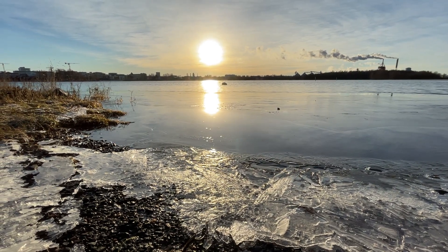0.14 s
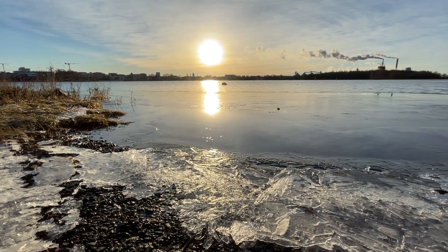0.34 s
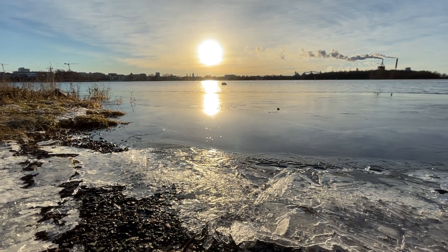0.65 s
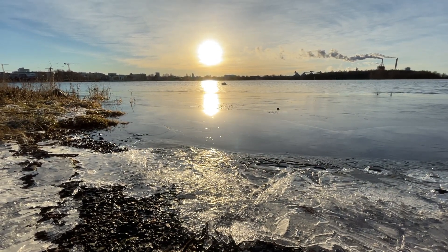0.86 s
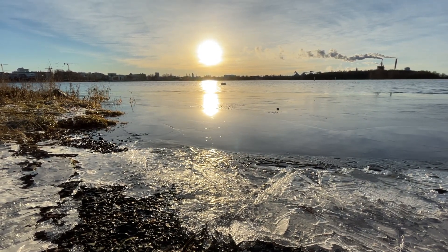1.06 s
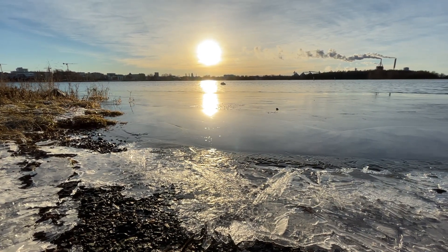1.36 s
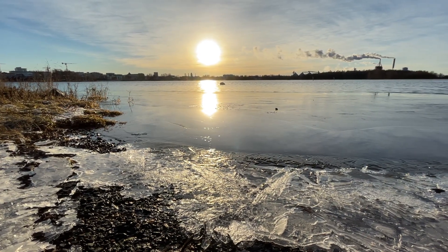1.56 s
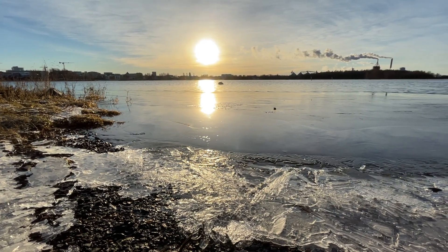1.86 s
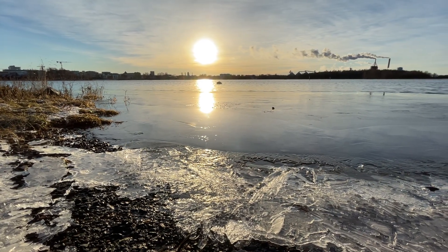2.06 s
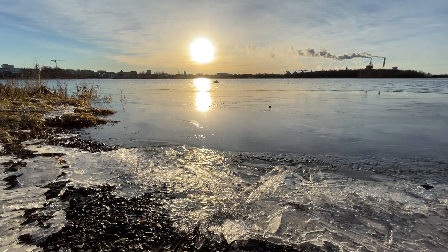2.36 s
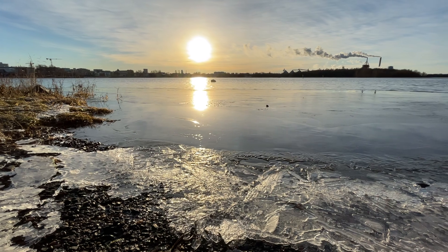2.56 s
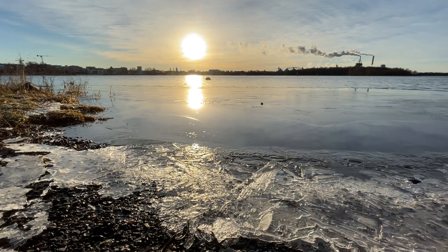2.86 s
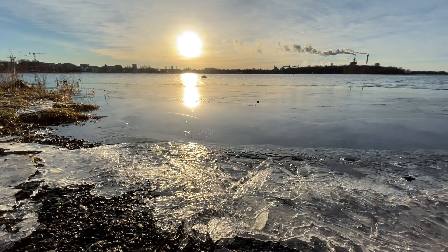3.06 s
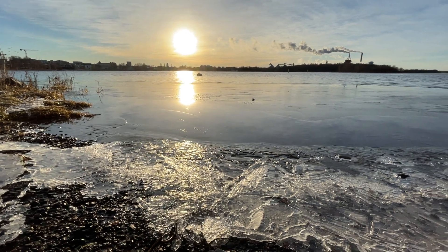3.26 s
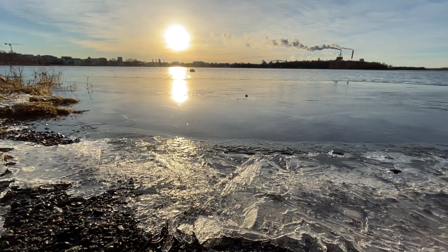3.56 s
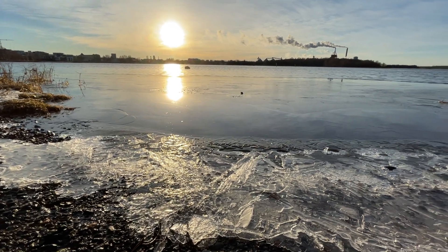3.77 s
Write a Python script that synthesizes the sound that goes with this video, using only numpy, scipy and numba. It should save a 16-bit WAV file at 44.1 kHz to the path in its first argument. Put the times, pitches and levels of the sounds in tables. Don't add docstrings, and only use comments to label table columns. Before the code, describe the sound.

Thin ice sheets crackle and tick sharply at a stony shore over soft fizzing wash

```python
import sys
import numpy as np
from scipy import signal
from scipy.fft import rfft, irfft
from scipy.io import wavfile
from scipy.ndimage import uniform_filter1d, map_coordinates
from numba import njit

SR = 44100
rng = np.random.default_rng(int(sys.argv[2]) if len(sys.argv) > 2 else 0)


def put_to_file(sound):
    columns = np.atleast_2d(sound).T
    safe = np.clip(columns, -1, 1)
    whole_steps = np.round(safe * 32767)
    wavfile.write(sys.argv[1], SR, whole_steps.astype(np.int16))


def natural_amplitude(level_db):
    exponent = np.asarray(level_db, float) / 20
    return 10 ** exponent


N = 172872

# onset [t/s], peak [level/dB], ping [f/Hz], treble spray re ping [level/dB]
DULL_CRACKS = [(0.11, -51.5, 2640, 6), (0.2234, -47.5, 1700, -2), (1.2365, -42, 4360, -6),
               (1.2503, -40.5, 4150, 2.5), (1.3475, -42, 3770, 3), (1.3728, -50, 3700, 2),
               (1.499, -50.5, 4200, 9), (1.5895, -50, 3220, 3), (1.6344, -46.5, 4060, 0),
               (2.1014, -45, 4460, -0.5), (2.183, -42, 4430, -9), (2.204, -48, 1510, -7),
               (2.224, -52, 2430, -1), (2.3166, -59, 4160, -11), (2.394, -44.5, 3170, 4),
               (2.434, -46, 2000, 8), (2.5067, -54, 4030, 17.5), (2.9808, -44.5, 3630, 7),
               (3.124, -34, 4600, -19), (3.1875, -47.5, 2550, -15), (3.3334, -41.5, 2700, 2.5),
               (3.5738, -38, 4190, -10), (3.6067, -33, 2840, -12), (3.6145, -32, 2320, -25),
               (3.6564, -47, 3380, 4), (3.692, -44, 2050, -6), (3.739, -62, 3450, -1),
               (3.8079, -45, 1310, -15), (3.8863, -48, 3100, 6)]
# onset [t/s], peak [level/dB], ping [f/Hz], low spray re ping [level/dB]
BRIGHT_CRACKS = [(0.1078, -41, 7340, -12), (0.432, -38.5, 6000, -19), (1.056, -40, 9230, -12),
                 (1.1433, -34.5, 8500, -15.5), (1.1973, -38, 9000, -25), (1.2386, -42.5, 5110, -11),
                 (1.2494, -38, 6960, -9.5), (1.3498, -32, 5400, -11.5), (1.3723, -35.5, 5360, -15),
                 (1.499, -44, 6200, -16), (1.5269, -42, 8600, -10), (1.647, -45, 6510, -10),
                 (2.2246, -33, 4900, -29), (2.239, -36, 9500, -10), (2.331, -44, 9900, -24),
                 (2.3642, -35.5, 6250, -18), (2.4282, -43, 8790, -8), (2.5067, -49, 5900, -1.5),
                 (2.7893, -27.5, 9200, -22.5), (2.8945, -33, 9700, -36), (2.9925, -39.5, 9720, -24),
                 (3.035, -31, 8100, -26), (3.1133, -37, 6480, -23), (3.3737, -40, 7700, -17),
                 (3.474, -43.5, 9700, -9), (3.5739, -48.5, 9900, 2.5), (3.615, -36.5, 6640, -7),
                 (3.6565, -33, 8240, -20), (3.82, -37, 8300, -12.5), (3.8939, -32, 7460, -16.5)]
# onset [t/s], peak [level/dB]
FAINT_CRACKS = [(0.0526, -40), (0.1369, -39.5), (0.5164, -43), (0.7173, -59), (0.7363, -45), (0.827, -35.5),
                (0.9532, -82), (1.2978, -39), (1.3295, -43), (1.4415, -39), (1.6084, -42), (1.6674, -48),
                (1.695, -50), (1.7277, -46), (1.7539, -46), (1.7965, -45), (1.8234, -51), (1.9793, -39),
                (2.144, -67), (2.2566, -34), (2.3047, -62), (2.662, -38.5), (2.9134, -39), (2.9226, -36),
                (3.412, -37), (3.512, -43), (3.5304, -38), (3.648, -51), (3.723, -44), (3.7467, -40)]
# onset [t/s], peak [level/dB], pitch [f/Hz]
PLATE_KNOCKS = [
    (1.349, -42.5, 550),
    (1.97, -57, 641),
    (1.991, -45, 690),
    (2.26, -45, 647),
    (2.504, -46.5, 620),
    (2.792, -66, 773),
    (3.615, -50, 646),
]
# onset [t/s], peak [level/dB], centre [f/Hz]
SMALL_TICKS = [(0.1543, -33.5, 8300), (0.2738, -47, 8520), (0.474, -45.5, 3930), (0.6398, -38, 7790),
               (0.6644, -30, 9780), (0.7514, -51, 5250), (1.083, -37, 10300), (1.1797, -38.5, 4200),
               (1.3034, -46, 4290), (1.314, -44, 6920), (1.3894, -41, 4290), (1.4014, -45, 9380),
               (1.4246, -42, 4500), (1.4674, -49, 3860), (1.518, -48, 3760), (1.5559, -47, 9390),
               (1.8714, -49.5, 3480), (1.9455, -59, 8550), (1.9717, -50, 6540), (1.9914, -45, 5380),
               (2.0303, -52, 4590), (2.0614, -54, 3710), (2.1001, -47, 4250), (2.393, -46, 2960),
               (2.4602, -37, 4220), (2.7687, -35, 9700), (2.8494, -48, 7540), (2.9494, -43, 7790),
               (3.02, -34, 9010), (3.0604, -48, 5410), (3.3039, -40, 6140), (3.4494, -57, 10100),
               (3.6732, -38, 5350), (3.7694, -43, 4030), (3.841, -53, 3800), (3.901, -33, 6280),
               (3.9114, -41, 3000)]
# onset [t/s], peak [level/dB], pitch [f/Hz], ring [cycles]
CLOSE_PLIPS = [(0.2229, -49.5, 1720, 4.8), (0.524, -55, 2300, 4), (1.3501, -52, 940, 5.3),
               (1.351, -43, 6000, 6.9), (1.350, -49, 3000, 4.4), (1.5898, -46.5, 1870, 7.5),
               (1.593, -52, 2300, 6.9), (1.352, -51, 2180, 1.8), (3.723, -50, 940, 2.1),
               (.2235, -58, 1450, 3.3), (1.872, -55.5, 1470, 2.3), (1.798, -57, 940, 3.3),
               (1.9695, -58, 930, 2.5), (1.992, -51, 930, 1.8), (2.205, -57, 1490, 5), (2.79, -62, 1260, 3),
               (3.333, -51.5, 1410, 4), (3.573, -56, 1610, 2.3), (3.6152, -42, 660, 2.3),
               (3.6152, -37.5, 1680, 5.2), (3.6152, -35, 3240, 2.2), (3.6155, -35.5, 2350, 5),
               (3.66, -50, 2000, 5.2), (3.692, -49.5, 1420, 2.5), (3.740, -49.5, 1510, 4),
               (3.808, -49, 2200, 4.6), (3.886, -52, 1290, 3)]
# time [t/s], fizz [level/dB], loose crackle re fizz [level/dB]
WASH_SWELL = [(0, -58.5, 1.5), (.18, -59, -2.5), (.25, -63.5, -0.5), (.42, -68, 3.5), (.5, -62.5, 4.5),
              (.72, -54.5, -7), (.95, -58.5, -1), (1.45, -60.5, 5), (1.66, -70, 7), (1.79, -73, 2),
              (1.85, -67, 2), (2.17, -64, 2.5), (2.3, -56.5, -1), (2.7, -57, 2), (2.95, -53, 1.5),
              (3.1, -58, -8), (3.58, -53, 0), (3.92, -54.5, -7)]
# [f/Hz], density per Hz [level/dB]
ICE_COLOUR = [(600, 9.5), (1500, 0), (2400, 0.5), (5400, 2), (7500, -0.5), (9500, 0), (12300, -6.5),
              (15500, -5)]
# [f/Hz], lag [radians]
PORT_LAG = [(0, 0), (1700, 3.1), (2400, 6.2), (3500, 6), (5300, 10.2), (7500, 6.6), (8300, 4.5),
            (11000, 5.7), (12000, 6.3), (14600, 9.4), (16000, 9.76)]
# [f/Hz], left minus right [level/dB]
PORT_BALANCE = [(1900, -.3), (5000, 1.5), (7500, -1), (9500, -8), (11000, -2), (13000, -.3)]
# [f/Hz], likeness [0-1]
PORT_LIKENESS = [(1000, .4), (2000, .25), (5300, .55), (9300, .15), (11800, .96), (13100, .78),
                 (14700, .94), (16000, .94)]
# [f/Hz], density per Hz [level/dB]
RUMBLE_COLOUR = [(15, -20), (25, 9), (59, 0), (196, -3), (280, -8), (626, -15.5), (749, -21), (945, -22.5),
                 (1800, -38.5), (2340, -35), (3960, -120)]
# [f/Hz], side minus mid [level/dB]
RUMBLE_SIDE = [(60, -16), (200, -12), (400, -8), (800, -5), (1800, -3)]

PING_DB, PING_CYCLES = -2.5, 3.6
SPRAY_S, TICK_CYCLES = .0025, 1.26
FAINT_DB, KNOCK_DB, KNOCK_CYCLES = -5.5, 3.5, 1.4
TICKS_DB, TICKS_WIDTH = -7.5, 1.64
PLIP_SIDE_DB = -3
FIZZ_DB = 2.53
CRACKLE_DB, CRACKLE_SPREAD_DB, CRACKLE_S, CRACKLE_OCTAVES = -1.5, 1.4, .001, 1
CRACKLE_LOW_HZ, PATCH_FULL_HZ = 2200, 4500
PATCH_DB, PATCH_PER_S, PATCH_HZ = 3.5, 9, 1670
SCATTER_DB, SCATTER_S = -11, .0025
RUMBLE_DB, RUMBLE_FLICKER_DB, RUMBLE_FLICKER_PER_S, RUMBLE_LAG_S = -48, -0.94, 5.46, .00027
RUMBLE_TOP_HZ = 2500
HUM_HZ, HUM_DB, HUM_WIDTH_HZ = 129.7, -63.5, 7.1
LOW_CUT_HZ, TOP_HZ = 42, 15850


def ice():
    hits = cracks(DULL_CRACKS, 4200, 15600) + cracks(BRIGHT_CRACKS, 995, 5900)
    hits = hits + faint_cracks() + knocks()
    crackle = swarm(CRACKLE_DB, CRACKLE_SPREAD_DB, CRACKLE_S, CRACKLE_OCTAVES, count=650, size=14, loose=1)
    fizz = swarm(FIZZ_DB, 0, .001, 0.4, count=12000, size=3)
    both = hits + crackle + fizz
    return ports(both + scatter(both))


def cracks(table, lo_hz, hi_hz):
    s, db, hz, rel_db = np.array(table).T[:, :, None]
    ping = ticks(s + 0.000305, hz, db + PING_DB, PING_CYCLES, apart=0.045)
    near = spray(s, db - 10, hz / 1.6, hz * 1.6)
    far = spray(s, db + rel_db, lo_hz, hi_hz)
    return ping + near + far


def spray(s, db, lo_hz, hi_hz, count=14):
    u = rng.random((len(s), 2, count))
    late = -np.log(1 - u[:, 0])
    hz = lo_hz * (hi_hz / lo_hz) ** u[:, 1]
    return ticks(s + SPRAY_S * late, hz, db - 3 * late, TICK_CYCLES)


def faint_cracks():
    s, db = np.array(FAINT_CRACKS).T[:, :, None]
    return spray(s, db + FAINT_DB, 4200, 17000, count=24)


def knocks():
    s, db, hz = np.array(PLATE_KNOCKS).T[:, :, None]
    return ticks(s, hz, db + KNOCK_DB, KNOCK_CYCLES, apart=0.028)


def small_ticks():
    s, db, hz = np.array(SMALL_TICKS).T[:, :, None]
    return ports(spray(s, db + TICKS_DB, hz / TICKS_WIDTH, hz * TICKS_WIDTH))


def plips():
    s, db, hz, cycles = np.array(CLOSE_PLIPS).T
    mid, side = ticks(s, hz, db, cycles)
    return mid + natural_amplitude(PLIP_SIDE_DB) * side * np.array([[1], [-1]])


def swarm(db, spread_db, burst_s, octaves, count, size, loose=0):
    u = rng.random((count, 3))
    v = rng.standard_normal((count, 2, size))
    s = u[:, :1] * N / SR + burst_s * v[:, 0]
    centre_hz = 1500 + 14200 * u[:, 1:2]
    hz = np.clip(centre_hz * 2 ** (octaves * v[:, 1]), 0, 17000)
    strength = wash(s) + loose * wash(s, axis=2)
    strength = strength + spread_db * np.minimum(-np.log(1 - u[:, 2:]), 2.6)
    x = ticks(s, hz, strength + patches(s, hz), TICK_CYCLES)
    flat = uniform_filter1d(np.abs(rfft(x[0])) ** 2, size=4000) ** -.5
    low_hz = 600 + loose * CRACKLE_LOW_HZ
    x = colour(x, lambda f: flat * natural_amplitude(curve(ICE_COLOUR, f)) * f ** 2 / (f ** 2 + low_hz ** 2))
    return level(x, db + np.mean(np.array(WASH_SWELL)[:, 1]))


def wash(s, axis=1):
    w = np.array(WASH_SWELL, float)
    return np.interp(s, w[:, 0], w[:, axis])


def patches(s, hz):
    field = rng.standard_normal((64, 32))
    drift = map_coordinates(field, [s * PATCH_PER_S, hz / PATCH_HZ], order=1, mode="mirror")
    return PATCH_DB * np.minimum(hz / PATCH_FULL_HZ, 1) * drift


def scatter(x):
    t = np.arange(1500) / SR
    tails = rng.standard_normal((2, t.size)) * np.exp(-t / SCATTER_S) * (t > .0005)
    tails = tails / np.sqrt(np.sum(tails ** 2, axis=1, keepdims=True))
    return natural_amplitude(SCATTER_DB) * signal.fftconvolve(x, tails, axes=1)[:, :N]


def ports(x):
    lag_hz, lag = np.array(PORT_LAG).T
    like = lambda f: curve(PORT_LIKENESS, f)
    half = lambda f: curve(PORT_BALANCE, f) / 2
    left = colour(x[0], lambda f: natural_amplitude(half(f)) * np.exp(-1j * np.interp(f, lag_hz, lag)))
    right = colour(x[0], like) + colour(x[1], lambda f: np.sqrt(1 - like(f) ** 2))
    return np.array([left, colour(right, lambda f: natural_amplitude(-half(f)))])


@njit
def ring(n, start, omega, decay, size, phase):
    out = np.zeros(n)
    for g in range(len(start)):
        i0 = int(start[g])
        p = np.exp(-1 / decay[g] + 1j * omega[g])
        z = size[g] * np.exp(1 + 1j * (phase[g] - omega[g] * (start[g] - i0))) / decay[g]
        for i in range(min(int(8 * decay[g]), n - i0)):
            out[i0 + i] += i * z.imag
            z *= p
    return out


def ticks(s, hz, db, cycles, apart=0.92):
    hz = np.clip(hz, 300, .45 * SR).ravel()
    phase = 2 * np.pi * rng.random((2, hz.size))
    phase[1] = phase[0] + apart * phase[1]
    start = np.clip(s.ravel() * SR, 0, N - 1.)
    omega = 2 * np.pi * hz / SR
    decay = cycles * SR / hz / np.pi
    size = natural_amplitude(db.ravel())
    return np.array([ring(N, start, omega, decay, size, p) for p in phase])


def rumble():
    dark = lambda f: natural_amplitude(curve(RUMBLE_COLOUR, f)) * (f < RUMBLE_TOP_HZ)
    mid = colour(rng.standard_normal(N), dark)
    side = colour(rng.standard_normal(N), lambda f: dark(f) * natural_amplitude(curve(RUMBLE_SIDE, f)))
    left = colour(mid + side, lambda f: np.exp(-2j * np.pi * f * RUMBLE_LAG_S))
    wind = level(np.array([left, mid - side]), RUMBLE_DB)
    wind = wind * natural_amplitude(RUMBLE_FLICKER_DB * walk(RUMBLE_FLICKER_PER_S))
    hum = colour(rng.standard_normal(N), lambda f: 1 / (1 + ((f - HUM_HZ) / HUM_WIDTH_HZ * 2) ** 2))
    return wind + level(hum, HUM_DB)


def walk(rate):
    k = int(SR / rate)
    steps = np.repeat(rng.standard_normal(N // k + 1), k)
    return level(uniform_filter1d(uniform_filter1d(steps, k), k)[:N], 0)


def curve(table, hz):
    t = np.array(table, float)
    return np.interp(np.log(hz + 1), np.log(t[:, 0] + 1), t[:, 1])


def colour(x, gain):
    return irfft(rfft(x) * gain(np.arange(N // 2 + 1) * SR / N), N)


def level(x, db):
    return x * natural_amplitude(db) / np.sqrt(np.mean(x ** 2))


def scene():
    return ice() + small_ticks() + plips() + rumble()


def low_pass(x):
    return signal.sosfilt(signal.butter(12, 15920, fs=SR, output="sos"), x)


def record(dry):
    low_cut = signal.butter(8, LOW_CUT_HZ, "high", fs=SR, output="sos")
    x = signal.sosfilt(low_cut, dry)
    x = colour(x, lambda f: f < TOP_HZ)
    return low_pass(x)


dry = scene()
out = record(dry)
put_to_file(out)
```